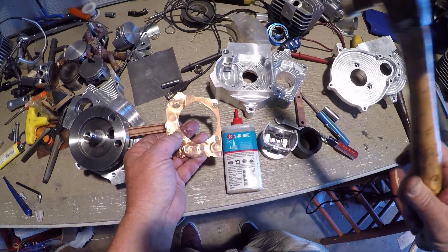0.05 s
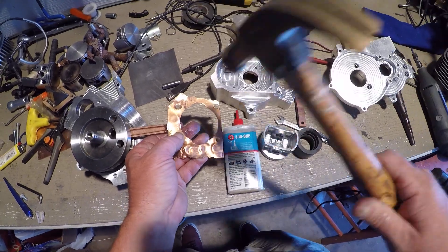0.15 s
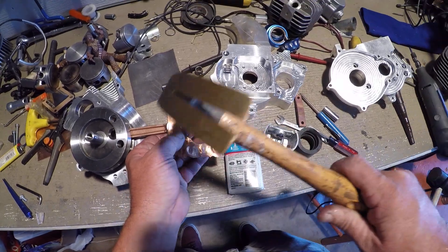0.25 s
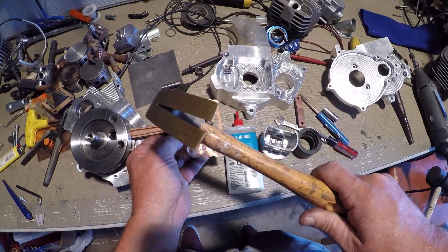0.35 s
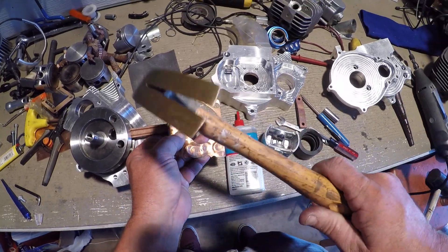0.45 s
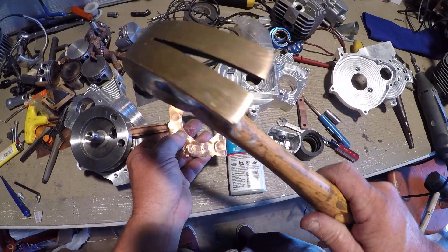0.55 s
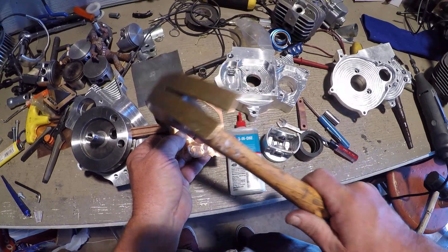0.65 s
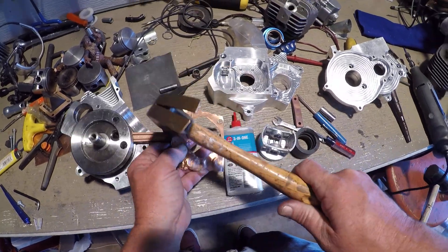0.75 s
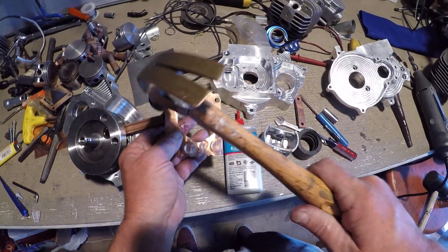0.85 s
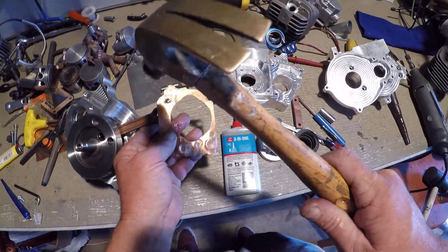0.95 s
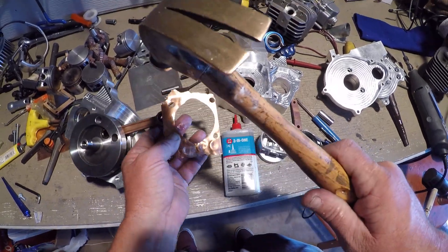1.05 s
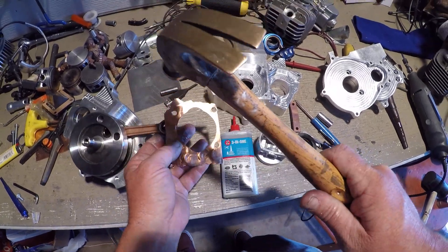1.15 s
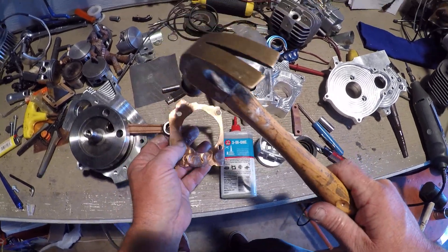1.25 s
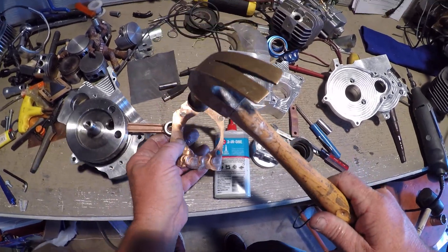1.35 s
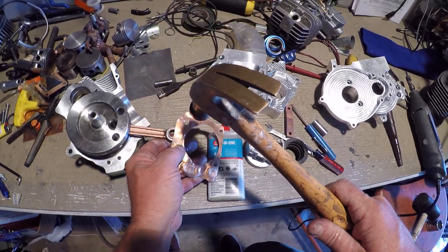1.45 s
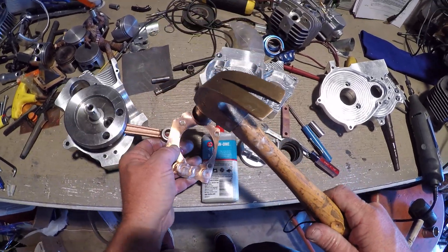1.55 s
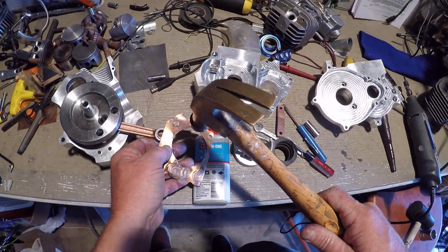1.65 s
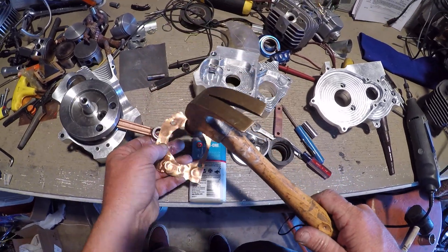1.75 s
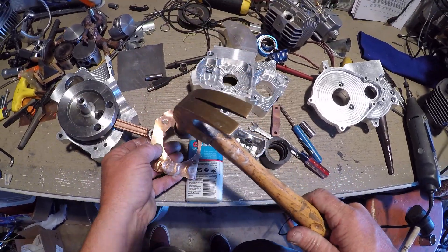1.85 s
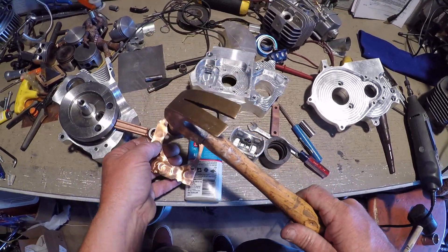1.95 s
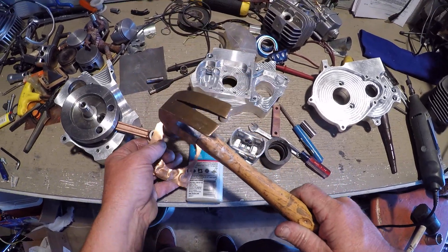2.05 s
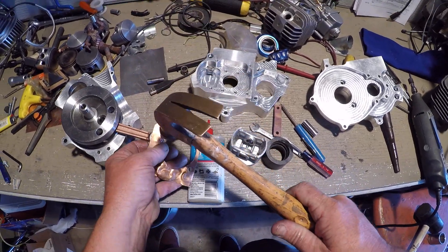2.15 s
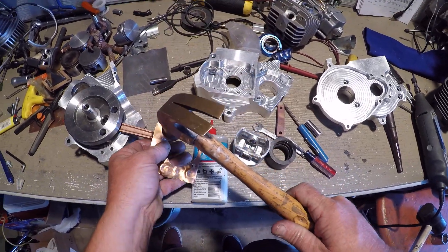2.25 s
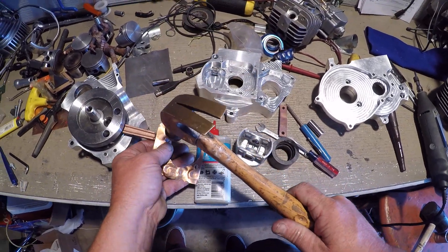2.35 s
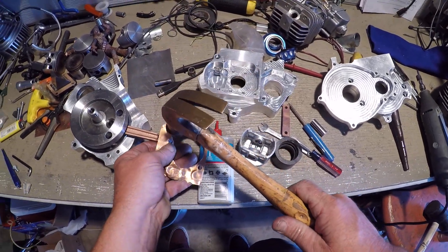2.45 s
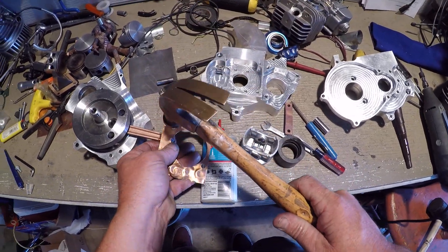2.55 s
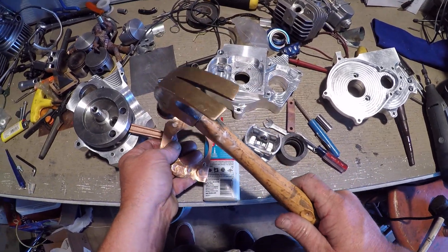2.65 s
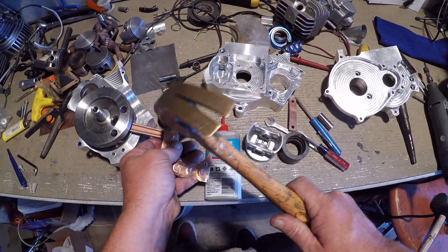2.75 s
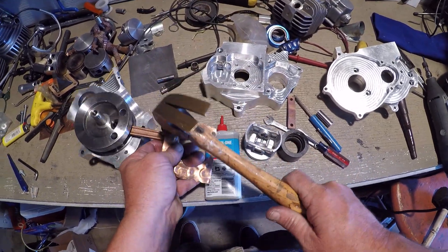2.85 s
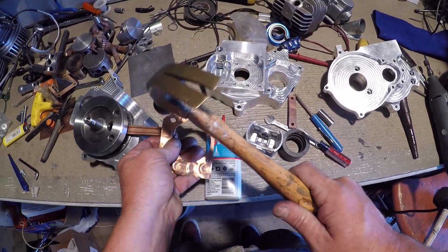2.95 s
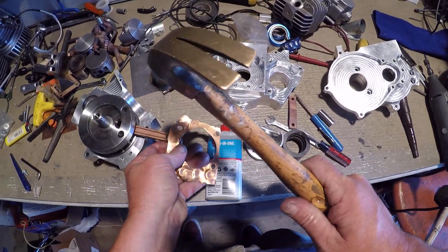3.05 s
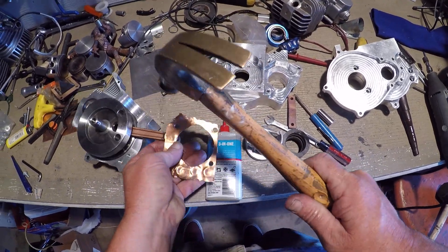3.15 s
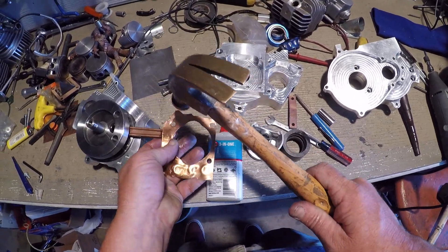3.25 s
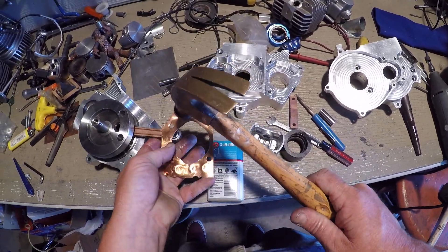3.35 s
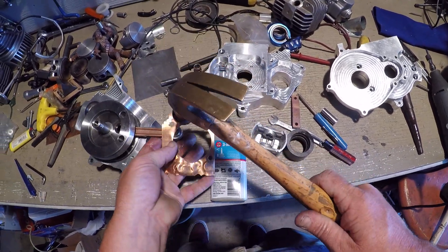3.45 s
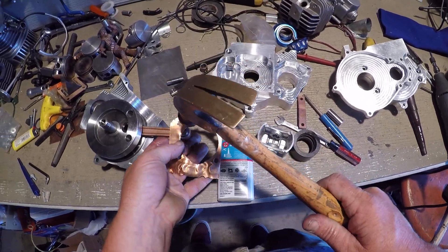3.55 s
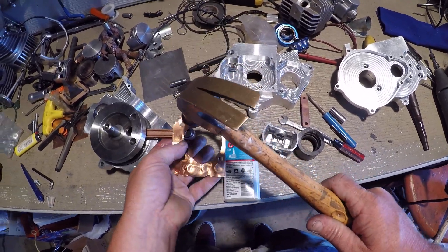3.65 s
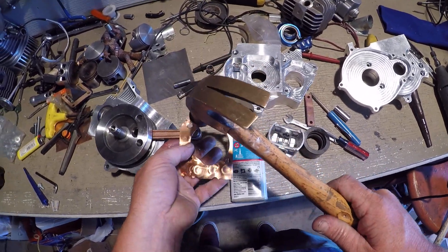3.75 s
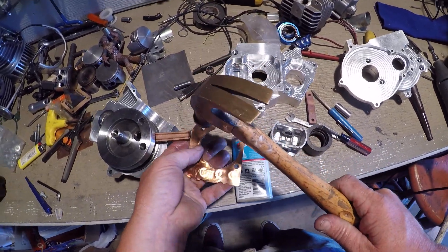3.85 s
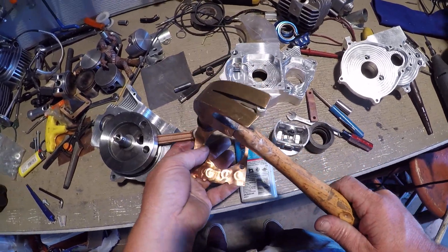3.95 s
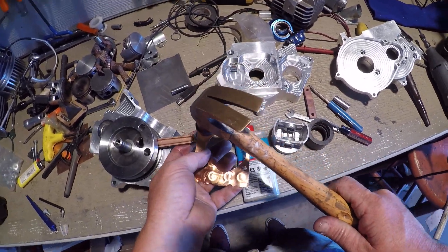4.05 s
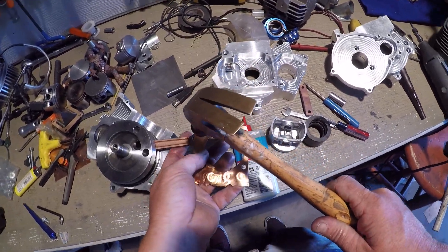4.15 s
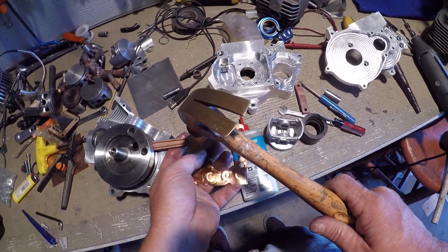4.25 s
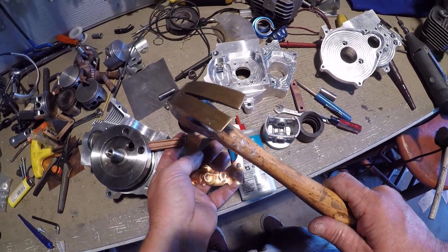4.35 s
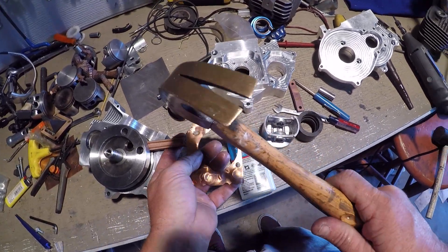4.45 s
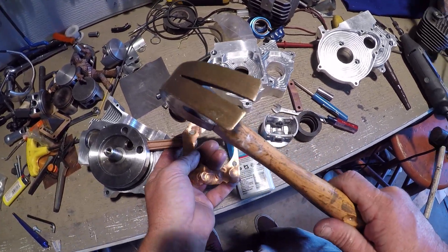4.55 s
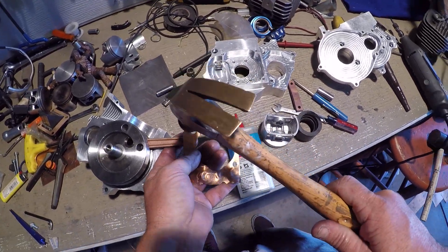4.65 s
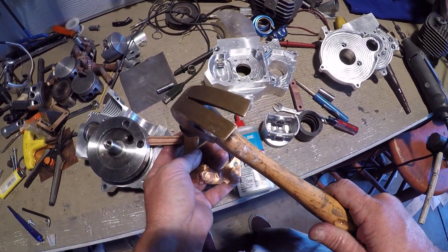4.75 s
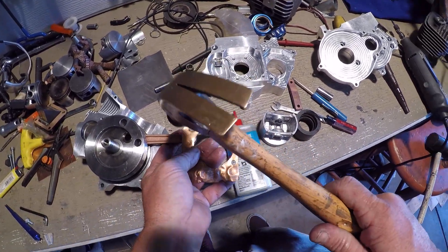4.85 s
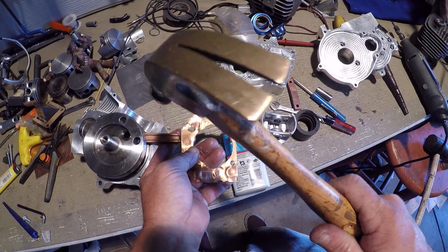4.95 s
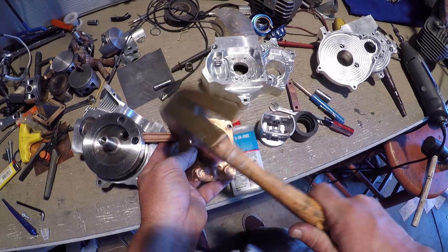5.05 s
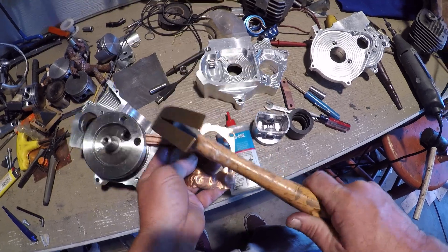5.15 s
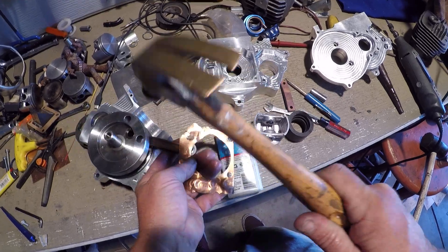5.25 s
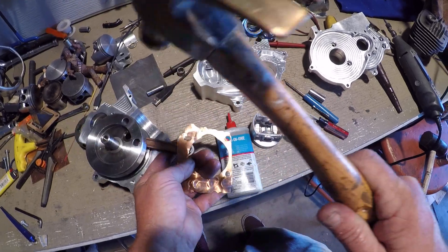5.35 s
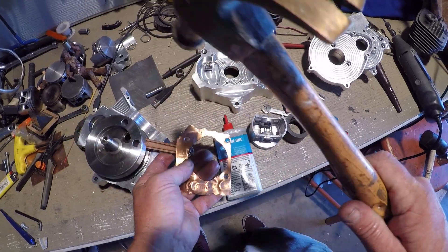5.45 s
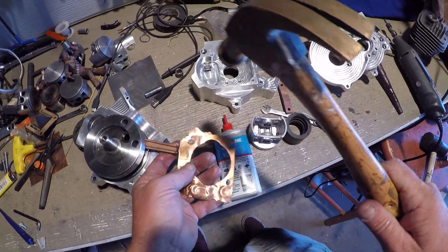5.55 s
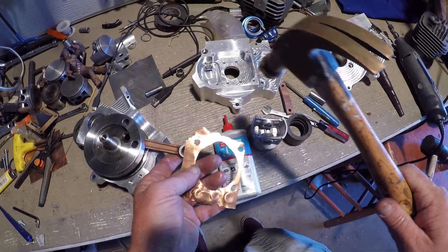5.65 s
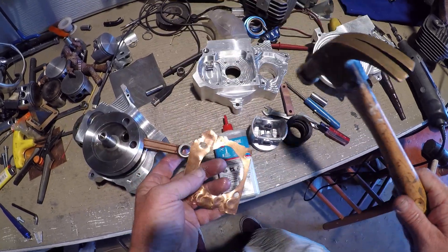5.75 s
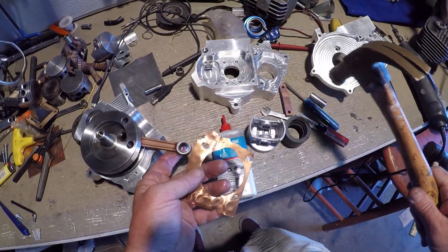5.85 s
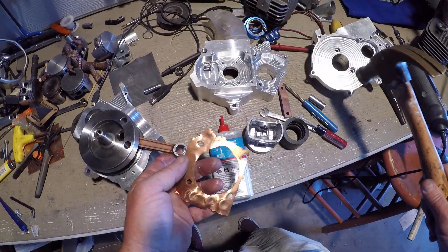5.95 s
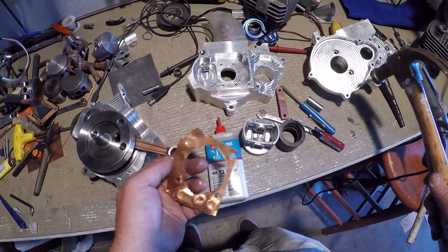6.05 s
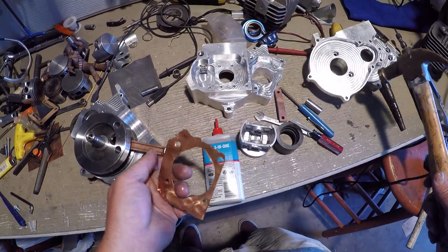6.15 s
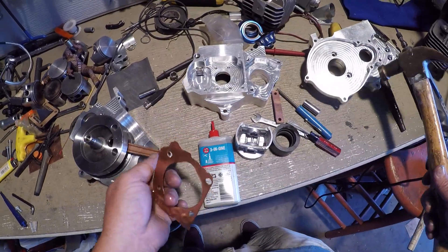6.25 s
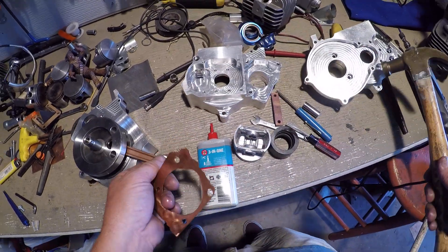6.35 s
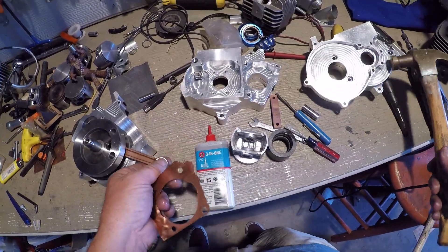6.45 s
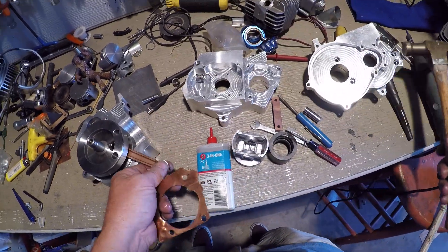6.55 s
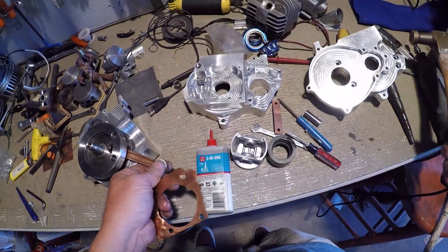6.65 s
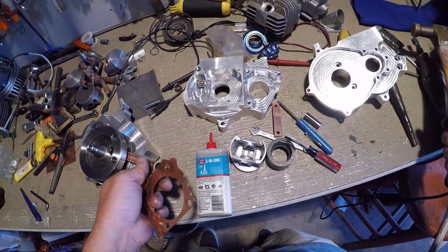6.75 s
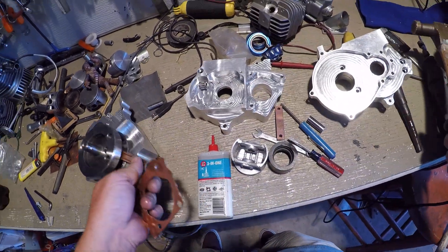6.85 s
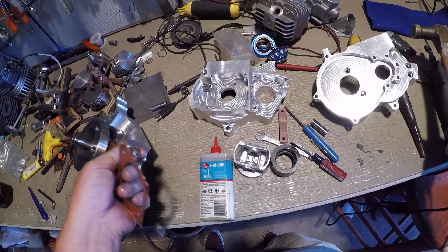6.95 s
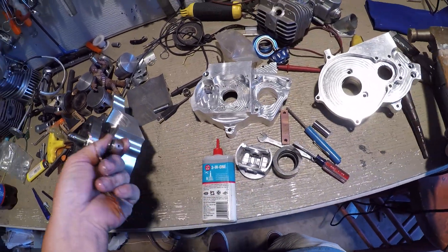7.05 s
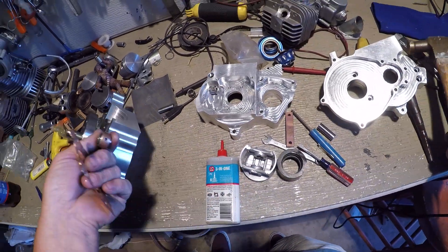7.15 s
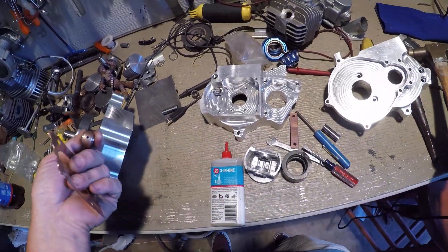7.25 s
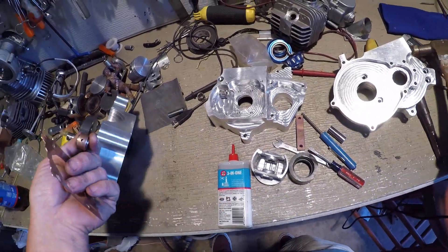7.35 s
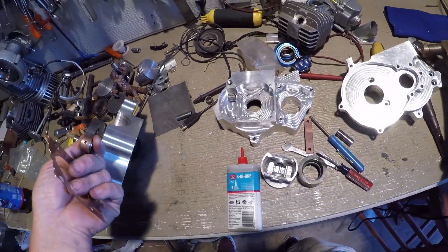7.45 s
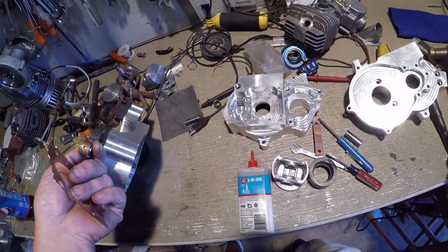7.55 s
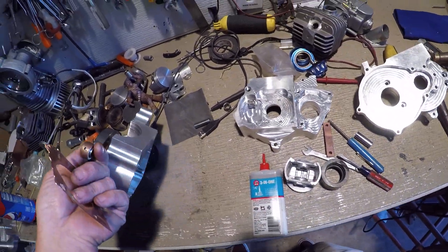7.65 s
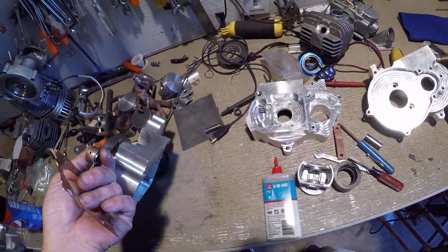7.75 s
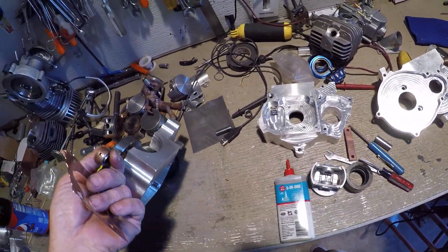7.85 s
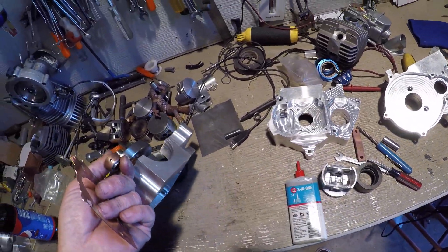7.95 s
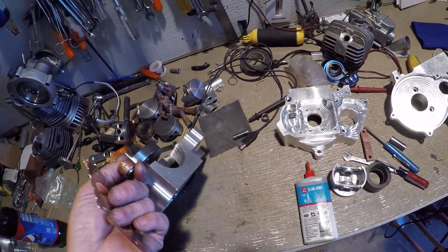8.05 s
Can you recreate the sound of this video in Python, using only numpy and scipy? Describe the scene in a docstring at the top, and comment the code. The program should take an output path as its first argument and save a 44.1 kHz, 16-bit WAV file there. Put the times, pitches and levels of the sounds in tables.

```python
"""Faint hiss and hum, then a hammer taps a copper gasket flat on a crankshaft on a cluttered workbench.
Each blow is a gritty crack plus damped steel modes; bench modes boom and coloured grains rattle loose parts.
Then the connecting rod clinks, the crank pings, and the crankcase is tipped over and set down in rocking thuds.
A regular low throb, made of shaped bumps, rises with the deep bass; noise and wavering sines form the air."""
import sys
import numpy as np
from scipy import signal
from scipy.fft import rfft, irfft
from scipy.io import wavfile

SR = 44100
rng = np.random.default_rng(int(sys.argv[2]) if len(sys.argv) > 2 else 0)


def inscribe(sig):
    """Save sig as 16-bit PCM at rate SR to the path in sys.argv[1].

    A 1-D sig is mono; a 2-D sig holds one channel per row.
    Samples are clipped to [-1, 1] before scaling.
    """
    pcm = np.round(np.clip(np.atleast_2d(sig).T, -1, 1) * 32767)
    wavfile.write(sys.argv[1], SR, pcm.astype(np.int16))


N = 358091
TIME_S = np.arange(N) / SR
AGE_S = TIME_S[:SR]  # time since the onset of one event

# hammer blows: [t/s, strike/dB, chatter delay/s, chatter/dB, bench delay/s, boom/dB, rattle/dB,
# build-up/s, t60/s]
HAMMER_BLOWS = [(0.687, -21.5, .0105, -20.5, .019, -20.5, -17, 0.014, 0.21),
                (1.439, -37.5, .004, -44, 0.0062, -34.5, -38, 0.017, 0.51),
                (2.801, -16.5, .011, -29, .003, -10.5, -12.5, 0.01, 0.25),
                (5.081, -10, 0.022, -18, 0.0084, -11.5, -12, 0.019, 0.34)]
# struck steel, damped by the hand: [f/Hz, level/dB, t60/s]
STEEL_MODES = [(876, 2.5, 0.049), (2244, -8, 0.054), (3730, -0.5, 0.05), (3930, -18, 0.08),
               (4280, -2, 0.032), (4590, -10.5, 0.13), (4750, -15, 0.17), (5240, -3, 0.033),
               (5580, -12, 0.13), (6540, -14, 0.07), (9760, -18.5, 0.033)]
# crack of the hammer contact: [f/Hz, level/dB]
CONTACT_SPECTRUM = [(200, 14.5), (1000, 1.5), (3000, -1), (4000, 6), (5700, 4), (7500, -2.5),
                    (11000, -13.5), (13300, -6.5), (15500, -28)]
# loose steel part singing on after a blow: [f/Hz, level re strike/dB, t60/s]
SINGING_MODES = [(5700, -34, .9), (5830, -34, 1.0)]
STRIKE_T60_S, CHATTER_T60_S = 0.13, 0.18

# heavy parts bumping the bench: [t/s, boom/dB, rattle/dB, t60/s]
BENCH_KNOCKS = [(0.8, -24.5, -46, 0.14), (1.436, -39, -29.5, 0.075), (1.837, -41, -37.5, 0.075),
                (4.177, -36, -62, 0.083), (5.202, -17, -17, .38), (5.220, -11.5, -15.5, 0.23),
                (5.463, -37, -42.5, 1), (6.397, -30, -45, 0.33)]
# bench top: [f/Hz, level/dB, t60 before the overall fade/s]
BENCH_MODES = [(91.2, -2, 0.19), (139, -3, 0.64), (175, 3.5, 0.74), (202.5, 1, 0.52), (247.5, 0, 0.34),
               (307, -3, 0.11), (388, -1.5, 0.17), (479, -12.5, 0.23)]
# dense bench resonances: [f/Hz, level/dB]
BENCH_WASH_SPECTRUM = [(40, -59), (90, -27), (170, -9.5), (280, 0), (400, -17.5), (600, -15), (1300, -23.5),
                       (3000, -52)]
# loose parts on the bench: [f/Hz, level/dB]
RATTLE_SPECTRUM = [(200, 0.5), (480, 3.5), (850, -4), (1130, -13.5), (1420, 4.5), (1750, -3), (2200, -12),
                   (3000, -15.5), (3800, -12.5), (4700, -20.5), (6000, -15), (7300, -25), (9500, -31),
                   (11200, -78), (15000, -59)]
# landing of the crankshaft after it hops; level re the blow's knock
HOP_DELAY_S, HOP_DB, HOP_T60_S = 0.074, -11.5, 0.3
KNOCK_BUILD_S = 0.0048

# crankcase set down: [t/s, boom/dB, clank/dB, time between rocks/s]
SET_DOWNS = [(6.820, -19, -25, .026), (7.2273, -8, -17, 0.025), (7.595, -30, -18.5, 0.045),
             (7.605, -14.5, -28, .04), (7.829, -40, -40, .025), (7.851, -27.5, -45, 0.071),
             (8.032, -28.5, -45, 0.027)]
# clank of the aluminium case: [f/Hz, level/dB]
CASE_SPECTRUM = [(300, -22), (900, -6), (1100, -15), (1480, -2.5), (1720, -4.5), (2450, -17), (3300, -8.5),
                 (4300, -19), (6100, -20), (7200, -36), (9500, -36), (15000, -46)]
# case ring: [f/Hz, level/dB, t60 before hand damping/s]
CASE_RING_MODES = [(1475, -2, 0.2), (1592, 0.5, 0.061), (3200, -16, 0.14), (3400, -26, 0.3),
                   (3900, -21, 0.11), (4877, -33, 0.54), (5900, -26, 0.28), (5960, -33, 1.6)]
# level steps per rock, then decay times
ROCK_BOOM_STEP_DB, ROCK_CLANK_STEP_DB, LANDING_T60_S, ROCK_T60_S = -7, -7.5, 0.1, 0.17

# connecting rod against the case: [t/s, level/dB]
ROD_CLINKS = [(6.398, -33.5), (6.4507, -14.5), (6.474, -23.5), (6.5018, -18), (6.533, -25.5), (6.551, -32)]
# connecting rod: [f/Hz, level/dB, t60/s]
ROD_MODES = [(1167, -15, 0.3), (1600, -14.5, 0.42), (1890, -28, .22), (1970, -21, 0.23), (2567, 7, 0.065),
             (2650, -5.5, 0.052), (3295, -10.5, 0.34), (3960, -17, 0.16), (4690, -16, 0.31),
             (5430, -25, 0.14), (6700, -31, 0.29), (6900, -30, 0.27), (7531, -32, 0.27), (8500, -35, 0.4),
             (9350, -32, .3), (9950, -33, .25)]
# crack of the rod: [f/Hz, level/dB]
ROD_CRACK_SPECTRUM = [(300, -9), (750, -8), (1150, 6), (2100, 3), (2600, 4.5), (3100, -4.5), (4200, -11),
                      (5800, -24.5), (9000, -35), (15000, -41)]
# steel crank: [f/Hz, level/dB, t60/s]
CRANK_MODES = [(2633, -23.5, 1.2), (2700, -34, 1), (3080, -39.5, 5.8), (3373, -15.5, 1.15),
               (3530, 9.5, 0.48), (3620, -9.5, 0.73), (3870, -15, 0.4), (4060, -35, 1.9),
               (4560, -40.5, 1.1), (5050, -16, 0.16), (5886, -0.5, 0.25), (6140, -27, 0.2),
               (7910, -10.5, 0.2), (8800, -27, 0.33), (10900, -47, .15), (13100, -35, .15)]
PING_S, PING_DB = 6.7215, -11.5

# touches of gasket, hammer and small parts: [t/s, level before the common trim/dB, f/Hz]
LIGHT_TOUCHES = [(1.4409, -31.5, 4800), (1.7809, -43.5, 5200), (1.8396, -43.5, 2200), (2.069, -33.5, 4110),
                 (2.9804, -30.5, 2220), (3.3207, -40.5, 3700), (3.4244, -39, 3810), (3.8138, -43, 4230),
                 (3.86, -37.5, 4120), (5.005, -36.5, 1960), (5.4247, -33, 2180), (5.5817, -37.5, 2060),
                 (7.227, -16, 3390), (7.5958, -19, 3530), (7.6616, -29, 3870), (8.0167, -40, 3520)]
# two soft, deep thumps: [t/s, level before bass gain/dB]
SOFT_THUMPS = [(6.285, -20), (6.393, -22)]
THUMP_HZ = 48

# deep-bass swells: [t/s, level/dB, hold/s]
BASS_GAIN_SWELLS = [(0.74, -8, .55), (2.807, -0.5, 1), (5.01, 0, 3)]
BASS_ATTACK_S, BASS_EBB_DB_PER_S, BASS_SHUT_DB = 0.068, 13.5, -38.5
THROB_FIRST_S, THROB_PERIOD_S = 0.049, 0.1024
THROB_DB, THROB_SCATTER_DB = -23.5, 1.5  # level before bass gain
# rumble under the throb: [f/Hz, level/dB]
RUMBLE_SPECTRUM = [(15, -2.5), (40, 3.0), (120, -2), (220, -21.5), (600, -45.0)]

# room tail, three parts: [f/Hz, level/dB]
LOW_TAIL_SPECTRUM = [(60, 3.5), (200, 0), (1800, -1), (2600, -11.5), (16000, -51)]
HIGH_TAIL_SPECTRUM = [(1000, -32), (3000, 15), (6000, 14), (7500, -17), (15000, -36)]
LATE_TAIL_SPECTRUM = [(60, 3.0), (900, 18), (1600, 14.5), (2500, -26), (4500, -7), (5800, 9), (7500, -53)]
# swelling hiss: [f/Hz, level/dB]
HISS_SPECTRUM = [(6500, -32), (8300, 2), (9700, 2), (10800, -3), (12000, -16), (15000, -24)]
# workshop air: [f/Hz, relative level/dB]
AIR_SPECTRUM = [(20, -34), (112, -34), (135, 0.5), (200, -0.5), (260, -5.5), (370, -3), (480, -9.5),
                (900, -13), (2000, -18), (5000, -28.5), (7500, -31.5), (9000, -31), (12000, -39),
                (15500, -45)]
AIR_DB = -45
# hum: [f/Hz, rms level/dB]
HUM_TONES = [(188.4, -54), (360.7, -56), (8543, -76)]
TOP_HZ = 15350


def hammer(ring_db=-2, crack_db=-4, press_s=0.0021):
    """Steel meets steel through soft copper and chatters once: a gritty crack and a short, bright clack."""
    out = np.zeros(N)
    for t_s, strike_db, delay_s, chatter_db, *_ in HAMMER_BLOWS:
        singing = rise(0.01) * ring(SINGING_MODES, scatter_db=1.5, detune=0.005)
        add(out, t_s, undb(strike_db) * singing)
        hits = [(t_s, strike_db, STRIKE_T60_S), (t_s + delay_s, chatter_db, CHATTER_T60_S)]
        for hit_s, db, t60_s in hits:
            crack = colour(grains(spread_db=1.5), CONTACT_SPECTRUM) * fade(t60_s)
            clack = ring(STEEL_MODES, scatter_db=4.0, detune=0.0094)
            contact = undb(crack_db) * crack + undb(ring_db) * clack
            add(out, hit_s, undb(db) * rise(press_s) * contact)
    return out


def knocks():
    """The bench takes up each blow, then the landing of the hopping crankshaft, and bumps of heavy parts."""
    out = np.zeros(N)
    for t_s, _, _, _, delay_s, boom_db, rattle_db, build_s, t60_s in HAMMER_BLOWS:
        add(out, t_s + delay_s, knock(boom_db, rattle_db, build_s, t60_s))
        hop = knock(boom_db, rattle_db, KNOCK_BUILD_S, HOP_T60_S)
        add(out, t_s + HOP_DELAY_S, undb(HOP_DB) * hop)
    for t_s, boom_db, rattle_db, t60_s in BENCH_KNOCKS:
        add(out, t_s, knock(boom_db, rattle_db, KNOCK_BUILD_S, t60_s))
    return out


def knock(boom_db, rattle_db, build_s, t60_s):
    """The bench top booms and shakes the parts that lie on it."""
    rattle = rise(build_s) * fade(t60_s) * colour(grains(spread_db=0.0), RATTLE_SPECTRUM)
    both = undb(boom_db) * boom(build_s, t60_s) + undb(rattle_db) * rattle
    return both * np.exp(np.log(1000) * build_s / t60_s)  # offsets the fade during build-up


def boom(build_s, t60_s, modes_db=-3, wash_db=-4):
    """The bench top swings up and dies away: a few clear modes in a wash of many."""
    modes = ring(BENCH_MODES, scatter_db=1.5, detune=0.024) * fade(1.82 * t60_s)
    wash = colour(rng.standard_normal(SR), BENCH_WASH_SPECTRUM) * fade(t60_s)
    return rise(build_s) * (undb(modes_db) * modes + undb(wash_db) * wash)


def crankcase(count=3):
    """The heavy case lands edge by edge and rocks to rest, each rock weaker."""
    out = np.zeros(N)
    for t_s, boom_db, clank_db, gap_s in SET_DOWNS:
        for k in range(count):
            rock_boom_db = boom_db + k * ROCK_BOOM_STEP_DB
            rock_clank_db = clank_db + k * ROCK_CLANK_STEP_DB
            t60_s = ROCK_T60_S if k else LANDING_T60_S
            add(out, t_s + k * gap_s, landing(rock_boom_db, rock_clank_db, t60_s))
    return out


def landing(boom_db, clank_db, t60_s, land_s=0.0014, build_s=0.0015,
            ring_db=-8, grit_db=-1.0, damped_t60_s=0.25, soft_hz=360):
    """An edge of the case lands: a gritty clank of hand-damped aluminium and a soft, low-passed bench thud."""
    grit = fade(t60_s) * colour(grains(spread_db=1.0), CASE_SPECTRUM)
    tone = fade(damped_t60_s) * ring(CASE_RING_MODES, scatter_db=4.5, detune=0.011)
    clank = rise(land_s) * (undb(grit_db) * grit + undb(ring_db) * tone)
    lowpass = signal.butter(2, soft_hz, fs=SR, output="sos")
    thud = signal.sosfilt(lowpass, boom(build_s, t60_s))
    return undb(boom_db) * thud + undb(clank_db) * clank


def rod(land_s=0.00046, ring_db=-2.0, thud_db=-13):
    """The connecting rod hits the case and bounces to rest; the bench thuds softly under it."""
    out = np.zeros(N)
    for t_s, db in ROD_CLINKS:
        crack = colour(rng.standard_normal(SR), ROD_CRACK_SPECTRUM) * fade(0.085)
        clink = rise(land_s) * (undb(ring_db) * ring(ROD_MODES, scatter_db=1.5) + crack)
        thud = boom(KNOCK_BUILD_S, 0.45)
        add(out, t_s, undb(db) * (clink + undb(thud_db) * thud))
    return out


def crank(dip_db=-15, tick_db=-18.5, tick_hz=2600):
    """The struck crank ticks, thuds and rings freely; the ring dips just after the strike and swells back."""
    out = np.zeros(N)
    dip = np.exp(-((AGE_S - 0.024) / 0.021) ** 2)
    ping = rise(0.00046) * ring(CRANK_MODES, scatter_db=1.0)
    add(out, PING_S, undb(PING_DB + dip_db * dip) * ping)
    strike = undb(tick_db) * tick(tick_hz, t60_s=0.054)
    add(out, PING_S, strike + landing(boom_db=-24.0, clank_db=-31.5, t60_s=0.22))
    return out


def ticks(trim_db=-5, t60_s=0.074):
    """Light touches among the parts, each a short metallic tick."""
    out = np.zeros(N)
    for t_s, db, hz in LIGHT_TOUCHES:
        add(out, t_s, undb(db + trim_db) * tick(hz, t60_s))
    return out


def tick(hz, t60_s, touch_s=0.0024, ring_db=-3, click_db=-2.5, partner_db=-4):
    """Small metal rings briefly with a close pair of modes; a lower piece also clicks more dully."""
    tone = ring([(hz, 0, t60_s), (hz * 1.035, partner_db, t60_s)], scatter_db=-1.5)
    click_spectrum = [(hz / 4, -5), (hz, 0), (2 * hz, -9), (4 * hz, -27)]
    click = colour(rng.standard_normal(SR), click_spectrum) * fade(t60_s)
    return rise(touch_s) * (undb(ring_db) * tone + undb(click_db) * click)


def thumps():
    """Two soft, deep thumps: each one slow push and pull with no click."""
    out = np.zeros(N)
    for t_s, db in SOFT_THUMPS:
        turn = 2 * np.pi * THUMP_HZ * (TIME_S - t_s)
        out -= undb(db) * turn * np.exp((1 - turn ** 2) / 2)
    return out


def workshop(x, wet_db=-14, low_t60_s=0.51, high_t60_s=0.54, late_t60_s=1.4, gap_s=0.0064, late_db=-20):
    """A cluttered room: a short diffuse tail, and a longer faint one as metal parts all around sing on."""
    low = colour(rng.standard_normal(SR), LOW_TAIL_SPECTRUM) * fade(low_t60_s)
    high = colour(rng.standard_normal(SR), HIGH_TAIL_SPECTRUM) * fade(high_t60_s)
    late = colour(rng.standard_normal(SR), LATE_TAIL_SPECTRUM) * fade(late_t60_s)
    tail = (low + high + undb(late_db) * late) * rise(gap_s) ** 2
    response = unit(tail) / np.sqrt(2 * SR)
    return x + undb(wet_db) * signal.fftconvolve(x, response)[:N]


def bass_gain():
    """The deep bass is nearly shut at first; it swells around the hard blows, holds, and ebbs away."""
    swells = []
    for t_s, db, hold_s in BASS_GAIN_SWELLS:
        attack = np.clip((TIME_S - t_s) / BASS_ATTACK_S, 0, 1)
        ebb_db = BASS_EBB_DB_PER_S * np.maximum(TIME_S - t_s - hold_s, 0)
        swells.append(attack * undb(db - ebb_db))
    return np.max(swells, axis=0) + undb(BASS_SHUT_DB)


def throb(push_s=0.0018, sag_s=0.0071, sag_delay_s=0.007, sag=0.48, rumble_db=-19):
    """Clock-steady bumps, probably electrical pickup: a short push, then a slower sag, over a low rumble."""
    out = np.zeros(N)
    lead_s = 1 / 50  # room for the bump's onset
    t_s = AGE_S - lead_s
    push = np.exp(-(t_s / push_s) ** 2)
    bump = push - sag * np.exp(-((t_s - sag_delay_s) / sag_s) ** 2)
    for beat_s in np.arange(THROB_FIRST_S, N / SR, THROB_PERIOD_S):
        add(out, beat_s - lead_s, bump * undb(THROB_SCATTER_DB * rng.standard_normal()))
    rumble = colour(rng.standard_normal(N), RUMBLE_SPECTRUM)
    return undb(THROB_DB) * (out + undb(rumble_db) * rumble)


def hiss_swell(sound, level_db=-62, open_db=-42, hold_s=0.29):
    """A thin, high hiss opens with the mean power of the last moments, so it swells after loud sounds."""
    size = max(int(hold_s * SR), 1)
    recent_power = signal.fftconvolve(sound ** 2, np.ones(size) / size)[:N].clip(0)
    opening = recent_power / (recent_power + undb(open_db) ** 2)
    return undb(level_db) * opening * colour(rng.standard_normal(N), HISS_SPECTRUM)


def air():
    """Steady workshop noise with a hum whose phase wanders slightly."""
    out = undb(AIR_DB) * colour(rng.standard_normal(N), AIR_SPECTRUM)
    for hz, db in HUM_TONES:
        waver_rad = np.cumsum(rng.standard_normal(N)) * 0.0192
        out += undb(db) * np.sqrt(2) * np.sin(2 * np.pi * hz * TIME_S + waver_rad)
    return out


def ring(modes, scatter_db, detune=0):
    """Decaying modes; each blow meets them at another spot and so with other strengths."""
    chance = rng.standard_normal((len(modes), 2))
    out = np.zeros(SR)
    for k, ((hz, db, t60_s), (level, pitch)) in enumerate(zip(modes, chance)):
        tone = np.sin(2 * np.pi * hz * (1 + detune * pitch) * AGE_S)
        out += (-1) ** k * undb(db + scatter_db * level) * fade(t60_s) * tone
    return out


def grains(spread_db):
    """A dense run of tiny impacts of unequal size, on about one sample in ten."""
    size = undb(max(spread_db, 0) * np.minimum(rng.exponential(size=SR), 4))
    return rng.standard_normal(SR) * size * (rng.random(SR) < 1 / 10)


def colour(x, points):
    """Shape a sound by a spectrum of [f/Hz, level/dB] points on a log-frequency axis; rms one."""
    hz, db = np.transpose(points)
    f_hz = np.maximum(np.fft.rfftfreq(len(x), 1 / SR), 1)
    gain = undb(np.interp(np.log(f_hz), np.log(hz), db))
    return unit(irfft(rfft(x) * gain, len(x)))


def fade(t60_s):
    """Exponential decay, 60 dB in t60_s."""
    return np.exp(-np.log(1000) * AGE_S / t60_s)


def rise(ramp_s):
    """Linear ramp from silence to full strength."""
    return np.minimum(AGE_S / max(ramp_s, 1 / SR), 1)


def undb(db):
    """Decibels to gain."""
    return 10 ** (np.asarray(db) / 20)


def unit(x):
    """Scale to an rms of one."""
    return x / np.sqrt(np.mean(x ** 2))


def add(track, t_s, sound):
    """Mix a sound into a track at a time."""
    start = int(t_s * SR)
    track[start:start + len(sound)] += sound[:N - start]


def soft_limit(x):
    """Round only the tallest peaks."""
    return x / (1 + (x / 0.97) ** 8) ** (1 / 8)


def scene(bass_hz=150):
    """Everything at the bench; the throb and the deepest thuds come and go together."""
    blows = workshop(hammer() + knocks() + crankcase() + ticks())
    handling = blows + workshop(rod() + crank(), wet_db=-21)
    f_hz = np.fft.rfftfreq(N, 1 / SR)
    bass = irfft(rfft(handling) * np.clip((bass_hz - f_hz) / 40, 0, 1), N)
    deep = bass_gain() * (bass + throb() + thumps())
    mono = handling - bass + deep + hiss_swell(handling) + air()
    return np.array([mono, mono])


def record(dry, double_lag_s=0.00003, right_db=-1.0):
    """Two microphone ports differ only in the highest treble; peaks are rounded, the top is cut steeply."""
    f_hz = np.fft.rfftfreq(N, 1 / SR)
    left, right = dry
    apart = np.clip((f_hz - 10500) / 1000, 0, 1)
    lag = np.exp(-1j * np.pi * f_hz * double_lag_s * apart)  # pi, not 2 pi: delays by half of double_lag_s
    right = irfft(rfft(right) * undb(right_db * apart) * lag, N)
    lowpass = signal.ellip(10, 0.2, 80, TOP_HZ, fs=SR, output="sos")
    return signal.sosfilt(lowpass, soft_limit(np.array([left, right])))


dry = scene()
out = record(dry)
inscribe(out)
```